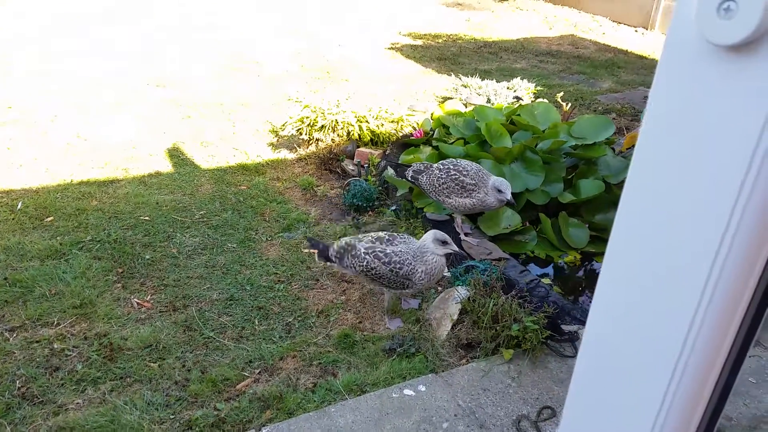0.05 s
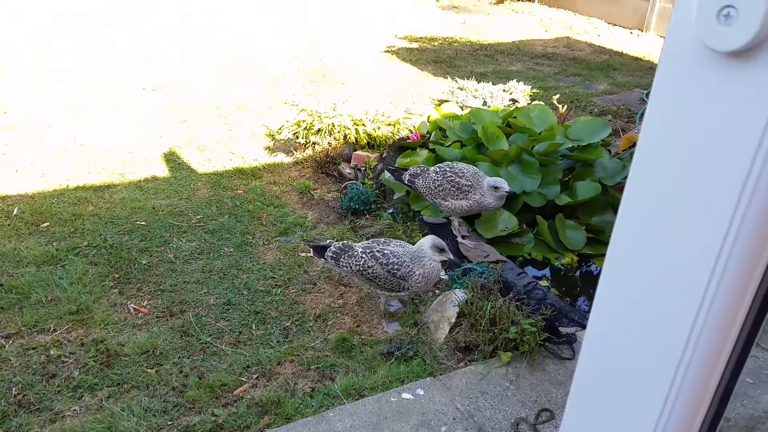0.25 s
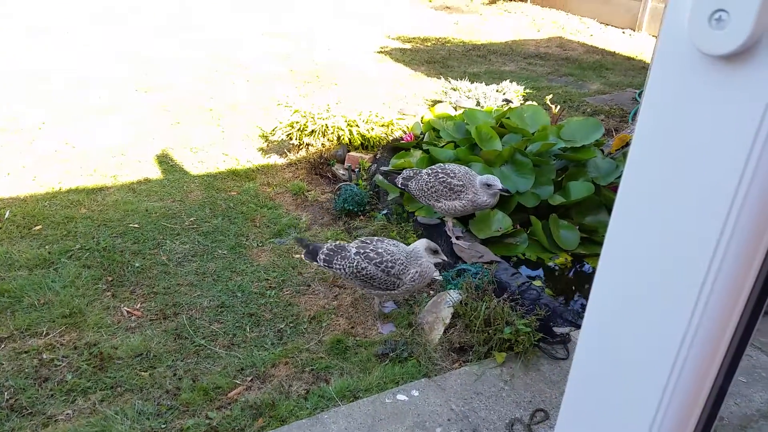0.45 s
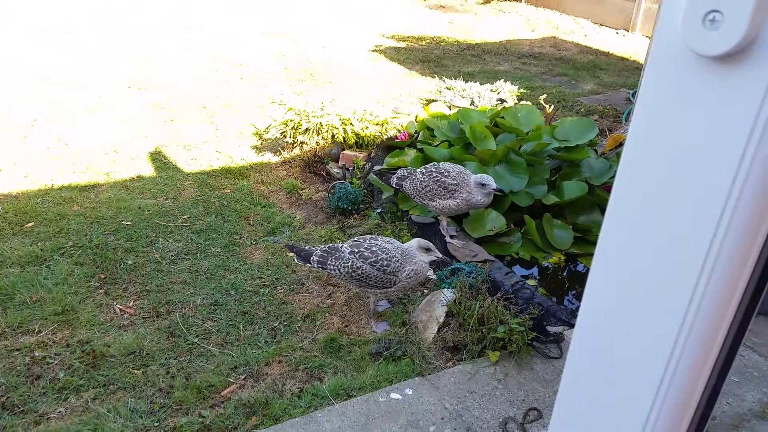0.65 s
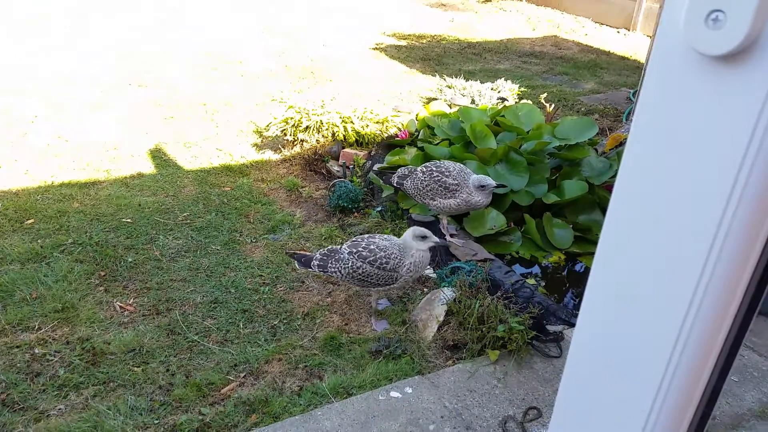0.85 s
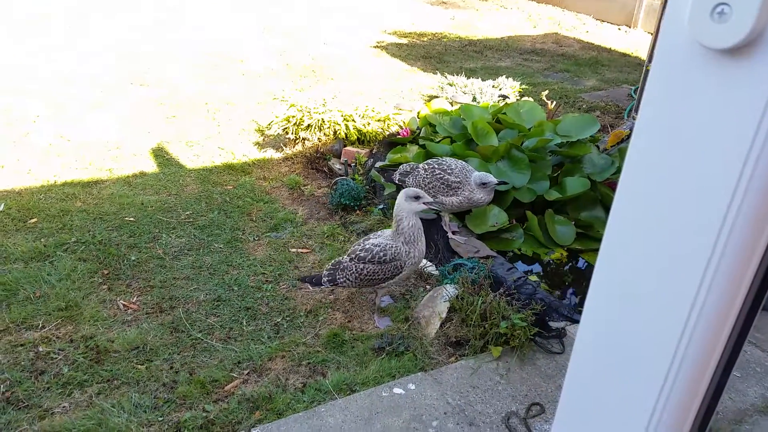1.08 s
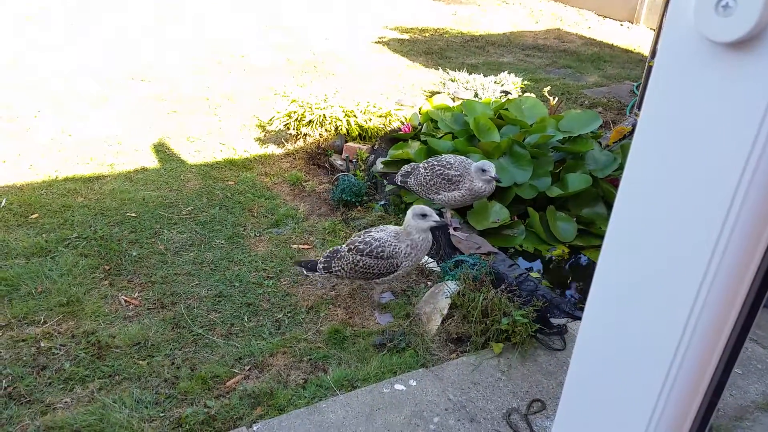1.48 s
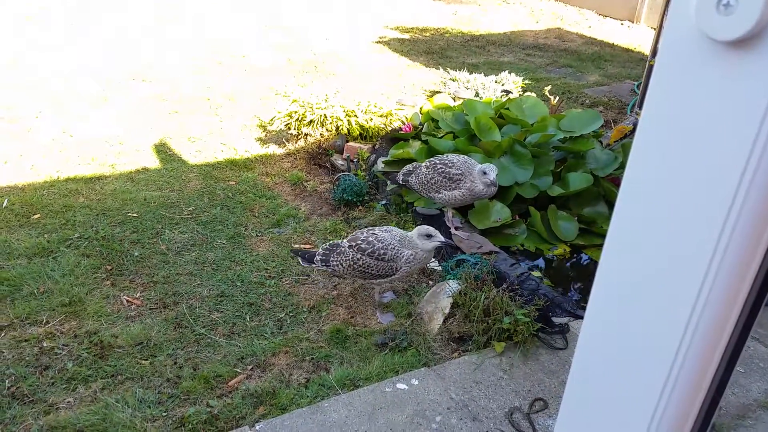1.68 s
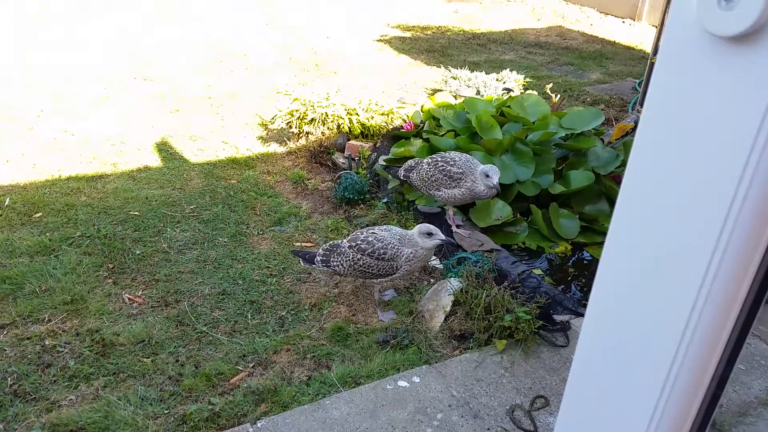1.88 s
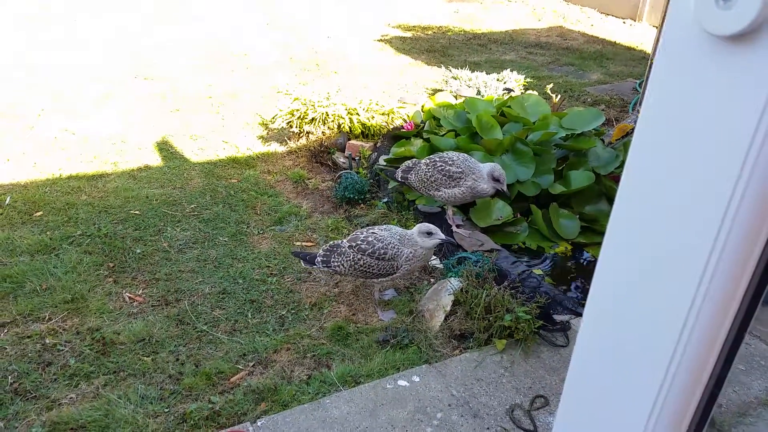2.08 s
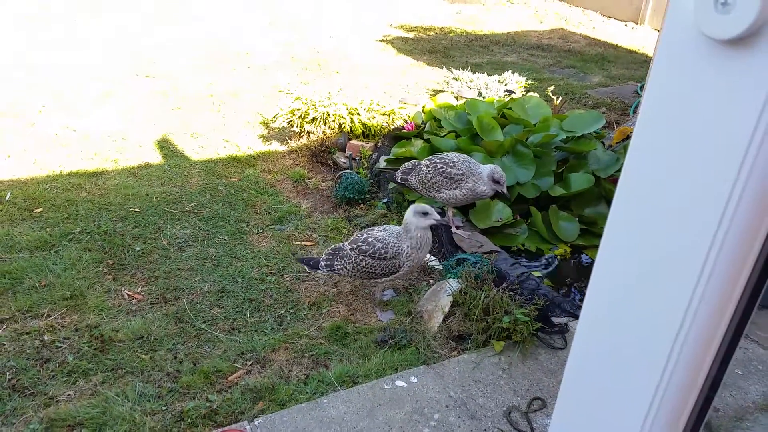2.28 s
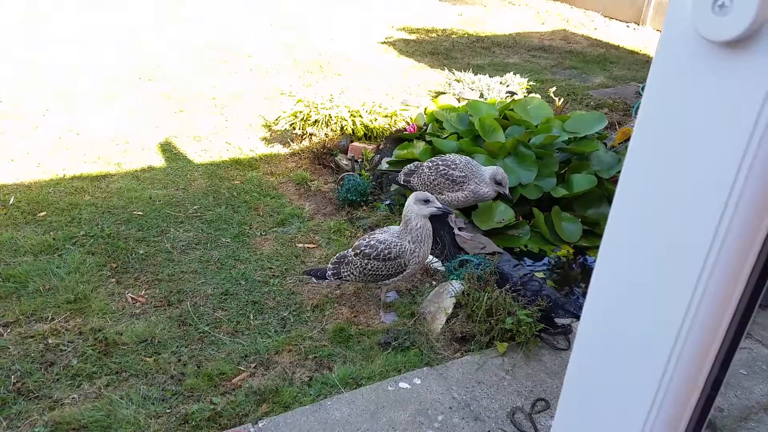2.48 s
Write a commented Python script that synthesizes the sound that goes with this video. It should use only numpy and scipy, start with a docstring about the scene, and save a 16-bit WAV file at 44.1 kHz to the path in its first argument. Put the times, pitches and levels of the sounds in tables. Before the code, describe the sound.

Thin, high whistles of young gulls overlap in two short bouts in a garden.

```python
"""Beside a garden pond, young gulls beg in two bouts of thin, overlapping, slowly falling whistles.
Each whistle is a tone with weak overtones; an unsteady voice and a breathy hiss make it hoarse.
Walls and paving throw back a short echo over steady low outdoor noise and one soft swell of noise.
The hand-held phone is bumped a few times; its left microphone hears the whistles just before its right."""
import sys
import numpy as np
from scipy import signal
from scipy.fft import rfft, irfft
from scipy.io import wavfile

SR = 44100
rng = np.random.default_rng(int(sys.argv[2]) if len(sys.argv) > 2 else 0)


def transcribe(u):
    """Save the signal u as a 16-bit wav file named by the first command-line argument.

    u: samples, shape (n,) or (channels, n), limited to [-1, 1]; the rate is SR.
    q: integer samples, one column per channel.
    """
    v = np.clip(np.atleast_2d(u).T, -1, 1)
    q = np.round(v * 32767).astype(np.int16)
    wavfile.write(sys.argv[1], SR, q)


N = 116865

# The gulls' whistles. Each row: second and third harmonic in dB against the main tone, how much louder
# the left side is in dB, how much earlier it is in milliseconds, roughness from 0 to 1, and a list of
# points along the whistle (time in seconds, pitch in Hz, level in dB).
GULL_WHISTLES = [ (-12, -18.5, -4, 0.222, 0.32, [(.237, 3185, -39), (.262, 3250, -38),
                 (.293, 3230, -38.5)]), (-22, -20, 4, 0.38, .5, [(.303, 3090, -38), (.32, 3020, -43),
                 (.356, 3095, -47)]), (-20.5, -15, 16, 0.364, 0.59, [(.29, 3770, -53), (.435, 3864, -53)]),
                 (-15.5, -15.5, 9, 0.357, 0.68, [(.335, 4190, -50), (.362, 4383, -38.5), (.41, 4237, -47.5),
                 (.53, 4160, -47.5)]), (-15, -13, 0, .345, .4, [(.372, 4980, -47), (.41, 4955, -38.5),
                 (.52, 4880, -38), (.585, 4740, -35), (.625, 4540, -44)]),
                 (-23, -20, 4, .256, .1, [(.472, 3810, -47), (.52, 3700, -39.5), (.6, 3645, -40),
                 (.665, 3575, -37), (.68, 3555, -29), (.765, 3440, -30), (.803, 3390, -33.5)]),
                 (-35, -48, 3.5, .31, 0.18, [(.55, 3760, -41.5), (.65, 3718, -38.5), (.75, 3660, -38),
                 (.82, 3600, -37), (.882, 3525, -33)]), (-13, -14, 5, 0.284, 0.18, [(1.497, 3990, -54),
                 (1.548, 4080, -41), (1.57, 4170, -51.5), (1.612, 4113, -39)]),
                 (-13, -30, 1, .358, .2, [(1.604, 4770, -31.5), (1.66, 4750, -36), (1.69, 4735, -30.5),
                 (1.765, 4670, -27.5), (1.785, 4635, -35), (1.87, 4540, -36.5)]),
                 (-15.5, -14, -3.5, 0.366, .3, [(1.632, 3139, -39), (1.685, 3124, -37.5),
                 (1.738, 3096, -45.5)]), (-22, -22, 4, 0.343, 0.46, [(1.69, 3690, -39.5),
                 (1.732, 3880, -34.5), (1.79, 3840, -42)]), (-17, -19, -4, .306, .15, [(1.827, 3780, -43),
                 (1.925, 3675, -33.5), (2.015, 3635, -36.5)]), (-17, -22, 4, .33, .9, [(1.722, 4400, -40),
                 (1.745, 4490, -33), (1.77, 4220, -42), (1.83, 4180, -41)]),
                 (-24, -20, 1, .335, .4, [(1.752, 5060, -36), (1.81, 5010, -31.5), (1.9, 4850, -38),
                 (1.94, 4660, -41)]), (-6, -12, 8, .325, .5, [(1.86, 4136, -43), (1.91, 4010, -42),
                 (1.94, 3980, -36.5), (2.04, 3850, -42)]), (-16.5, -14, -10, .355, 0.68, [(1.95, 4320, -45),
                 (2.03, 4200, -47)]), (-35, -23, 5.5, 0.29, 0.64, [(2.018, 4450, -39), (2.045, 4600, -41.5),
                 (2.07, 4345, -41.5), (2.135, 4180, -46)]), (-39, -35, 3, .314, 0.623, [(2.07, 3270, -55.5),
                 (2.155, 3060, -46), (2.182, 2960, -44)]), ]
# Hoarse, toneless parts of the calls. Each row: time of the peak, rise and decay in seconds,
# hiss level in dB, squeal level in dB, centre of the squeal in Hz.
GULL_CROAKS = [(.355, .045, .12, -50, -47, 4350), (.6, .1, .055, -50, -57, 5300),
               (.812, .008, .04, -60, -49, 2930), (.935, .025, .045, -49, -41.5, 4400),
               (.99, .03, .06, -57, -48, 3200), (1.74, .13, .1, -46.5, -45, 4200),
               (1.955, .03, .08, -47.5, -52, 5650)]
# Bumps on the phone. Each row: start in seconds, level in dB, pitch of the thump in Hz, decay in
# seconds, knock in dB against the thump, frequency in Hz above which the knock gets weaker.
PHONE_BUMPS = [(.101, -42, 50, .02, -3, 220), (.339, -33, 66, .013, -5, 270), (.59, -51, 70, .04, 1, 150),
               (2.3746, -30, 550, .0025, -2, 900), (2.3772, -32, 170, .006, -4, 350)]
# The tone colours of four noises. Each row: frequency in Hz, relative strength there in dB.
HISS_COLOUR = [(1200, -26), (2200, -8.5), (3000, 2.5), (4500, 0.5), (5100, -18), (5500, -5), (6900, -67),
               (7800, -1), (10000, -7.5), (12000, 4), (15500, -32)]  # breathy hiss of the calls, with the microphone's dip near 7 kHz
FINGER_COLOUR = [(3000, -7), (8000, -12), (12000, 7), (15500, -13)]  # a finger sliding on the case
SWELL_COLOUR = [(600, 7), (1400, 6.5), (2600, 3.5), (4000, -32), (6000, -50)]  # a soft mid-range swell
OUTDOOR_COLOUR = [(15, -51), (25, -10.5), (74, -3), (130, -6), (179, -4.5), (276, -11.5), (520, -11),
                  (760, -14), (960, -8.5), (2250, -25), (3800, -21), (4700, -29), (5300, -40), (6700, -48),
                  (8000, -34.5), (11800, -27), (13500, -30), (15800, -32.5)]  # the steady background
# How alike the background is on both sides. Each row: frequency in Hz, shared part from 0 to 1.
OUTDOOR_SHARE = [(30, 0.95), (200, 0.83), (600, 0.88), (1400, 0.15), (15000, 0.5)]

# How far and how fast a fully rough voice strays: pitch as a fraction of itself, level in dB.
WAVER, WAVER_PER_S = .007, 130
JITTER, JITTER_PER_S = .018, 1100
FLUTTER_DB, FLUTTER_PER_S = 4, 150
HARMONIC_FLUTTER_DB, HARMONIC_FLUTTER_PER_S = 4.5, 130  # overtones flicker whatever the roughness
HARMONIC_FALL_DB = -2  # step per harmonic above the third
ATTACK_S, RELEASE_S = .004, .006
EDGE_ROUGHNESS, EDGE_S = .25, .02  # extra roughness at both ends of a whistle
BREAK_START_S, BREAK_END_S, BREAK_HZ, BREAK_DB = 1.643, 1.672, 1575, -50
HISS_DB, REFERENCE_DB, HISS_GROWTH = -59, -35, .6  # a whistle at REFERENCE_DB brings hiss at HISS_DB
CROAK_FLUTTER_DB, SQUEAL_WIDTH_HZ, SQUEAL_FALL_HZ_PER_S = 1.6, 700, 3000
ECHO_DB, ECHO_DELAY_S, ECHO_FADE_S = -13, .006, .3  # the fade is the time to drop by 60 dB
BUMP_PAN_DB, RUSTLE_S, RUSTLE_WIDTH_S, RUSTLE_DB = 8, 2.361, .014, -49
SWELL_S, SWELL_WIDTH_S, SWELL_DB = .76, .23, -50
OUTDOOR_DB, OUTDOOR_PAN_DB, OUTDOOR_LEAD_MS = -48, 4, .243
TOP_HZ = 15900


def gulls(t):
    """All whistles and croaks, with a breathy hiss that follows their strength."""
    calls, whistle_power = 0, 0
    for second_db, third_db, pan_db, lead_ms, roughness, points in GULL_WHISTLES:
        tone, envelope = whistle(t, second_db, third_db, roughness, points)
        calls += left_and_right(tone, pan_db, lead_ms)
        whistle_power += envelope ** 2
    strength = np.sqrt(whistle_power) / gain(REFERENCE_DB)
    hiss_power = (gain(HISS_DB) * strength ** HISS_GROWTH) ** 2
    for peak, rise, decay, hiss_db, squeal_db, centre_hz in GULL_CROAKS:
        swell = np.exp(-(np.minimum(t - peak, 0) / rise) ** 2 - np.maximum(t - peak, 0) / decay)
        swell *= gain(CROAK_FLUTTER_DB * wobble(FLUTTER_PER_S))
        hiss_power += (gain(hiss_db) * swell) ** 2
        squeals = np.array([squeal(t, peak, centre_hz), squeal(t, peak, centre_hz)])
        calls += gain(squeal_db) * swell * squeals
    # one voice briefly breaks to half its pitch
    voice_break = gain(BREAK_DB) * fade(t, BREAK_START_S, BREAK_END_S) * np.sin(2 * np.pi * BREAK_HZ * t)
    return calls + voice_break + np.sqrt(hiss_power) * stereo_noise(HISS_COLOUR)


def whistle(t, second_db, third_db, roughness, points):
    """A thin tone with flickering overtones, hoarser at both ends. Returns it and its loudness curve."""
    times, pitch_hz, level_db = np.array(points).T
    from_edge_s = np.maximum(np.minimum(t - times[0], times[-1] - t), 0)
    rough = np.minimum(roughness + EDGE_ROUGHNESS * np.exp(-from_edge_s / EDGE_S), 1)
    stray = WAVER * wobble(WAVER_PER_S) + JITTER * wobble(JITTER_PER_S)
    hz = np.interp(t, times, pitch_hz) * (1 + rough * stray)
    flutter_db = rough * FLUTTER_DB * wobble(FLUTTER_PER_S)
    envelope = fade(t, times[0], times[-1]) * gain(np.interp(t, times, level_db) + flutter_db)
    phase = 2 * np.pi * np.cumsum(hz) / SR
    tone = np.sin(phase)
    overtones_db = [second_db, third_db, third_db + HARMONIC_FALL_DB, third_db + 2 * HARMONIC_FALL_DB]
    for harmonic, db in enumerate(overtones_db, start=2):
        if harmonic * pitch_hz.min() < TOP_HZ:
            flicker_db = HARMONIC_FLUTTER_DB * wobble(HARMONIC_FLUTTER_PER_S)
            tone += gain(db + flicker_db) * np.sin(harmonic * phase)
    return np.sqrt(2) * envelope * tone, envelope


def squeal(t, peak, centre_hz):
    """A whistle broken up into a narrow band of noise that slides down around its peak."""
    hz = centre_hz - SQUEAL_FALL_HZ_PER_S * np.clip(t - peak, -.1, .1)
    phase = 2 * np.pi * np.cumsum(hz) / SR
    low_pass = signal.butter(3, SQUEAL_WIDTH_HZ / 2, fs=SR, output="sos")
    slow_noise = signal.sosfilt(low_pass, rng.standard_normal((2, N)))
    # multiplying by a tone moves the noise up to that tone's pitch
    return (slow_noise[0] * np.sin(phase) + slow_noise[1] * np.cos(phase)) / slow_noise.std()


def garden_echo(t, sound):
    """Walls and paving scatter the sound into a short echo, different on each side."""
    tail = rng.standard_normal((2, N)) * np.exp(-np.log(1000) * t / ECHO_FADE_S) * (t > ECHO_DELAY_S)
    tail /= np.sqrt(np.sum(tail ** 2, axis=1, keepdims=True))
    return gain(ECHO_DB) * signal.fftconvolve(sound, tail, axes=1)[:, :N]


def hand_on_phone(t):
    """Dull bumps on the phone's body, and a brief rustle as a finger slides on the case."""
    bumps = 0
    for start, db, hz, decay, knock_db, knock_hz in PHONE_BUMPS:
        age = np.maximum(t - start, 0)
        thump = np.sin(2 * np.pi * hz * age)
        knock = gain(knock_db) * stereo_noise([(knock_hz, 0), (4 * knock_hz, -20), (20000, -65)])
        bumps += gain(db) * (t > start) * np.exp(-age / decay) * (thump + knock)
    slide = np.exp(-((t - RUSTLE_S) / RUSTLE_WIDTH_S) ** 2)
    return bumps * pan(BUMP_PAN_DB) + gain(RUSTLE_DB) * slide * stereo_noise(FINGER_COLOUR)


def soft_swell(t):
    """Mid-range noise that rises and falls under the first bout of calls."""
    return gain(SWELL_DB) * np.exp(-((t - SWELL_S) / SWELL_WIDTH_S) ** 2) * stereo_noise(SWELL_COLOUR)


def outdoors():
    """Steady low noise; the two microphones share most of its bass."""
    share = np.clip(over_frequency(OUTDOOR_SHARE), 0, 1)
    common = rfft(left_and_right(noise(OUTDOOR_COLOUR), pan_db=0, lead_ms=OUTDOOR_LEAD_MS))
    separate = rfft(stereo_noise(OUTDOOR_COLOUR))
    air = irfft(np.sqrt(share) * common + np.sqrt(1 - share) * separate, N)
    return gain(OUTDOOR_DB) * pan(OUTDOOR_PAN_DB) * air


def gain(db):
    """Turn decibels into a number to multiply by."""
    return 10 ** (np.asarray(db) / 20)


def pan(db):
    """Left and right gains that make the left side louder by this many dB."""
    return gain(np.array([[db], [-db]]) / 2)


def left_and_right(sound, pan_db, lead_ms):
    """One sound at two microphones: it reaches the right one later."""
    delay = np.exp(-2j * np.pi * np.fft.rfftfreq(N, 1 / SR) * lead_ms / 1000)
    return pan(pan_db) * np.array([sound, irfft(rfft(sound) * delay, N)])


def fade(t, start, end):
    """Fade in quickly, hold from start to end, then die away."""
    return np.clip((t - start) / ATTACK_S + 1, 0, 1) * np.exp(-np.maximum(t - end, 0) / RELEASE_S)


def wobble(steps_per_s):
    """Glide smoothly between random values, typically about 1 away from zero."""
    steps = np.arange(N) / SR * steps_per_s
    values = rng.standard_normal(N // 8)
    index = steps.astype(int)
    part = steps - index
    glide = part * part * (3 - 2 * part)
    return 1.15 * (values[index] + (values[index + 1] - values[index]) * glide)


def over_frequency(points):
    """Join rows of (frequency in Hz, value) into a curve over all frequencies."""
    hz, value = np.array(points, float).T
    return np.interp(np.log(np.fft.rfftfreq(N, 1 / SR) + 1), np.log(hz), value)


def noise(colour):
    """Noise with the given tone colour, scaled to a strength of 1."""
    shaped = irfft(rfft(rng.standard_normal(N)) * gain(over_frequency(colour)), N)
    return shaped / shaped.std()


def stereo_noise(colour):
    """Unrelated noise on the left and on the right."""
    return np.array([noise(colour), noise(colour)])


def scene():
    """The gulls, their echo, the garden's background and the hand on the phone."""
    t = np.arange(N) / SR
    calls = gulls(t)
    return calls + garden_echo(t, calls) + outdoors() + soft_swell(t) + hand_on_phone(t)


def record(dry):
    """The phone cuts off the highest treble."""
    return signal.sosfilt(signal.ellip(10, .2, 80, TOP_HZ, fs=SR, output="sos"), dry)


dry = scene()
out = record(dry)
transcribe(out)
```